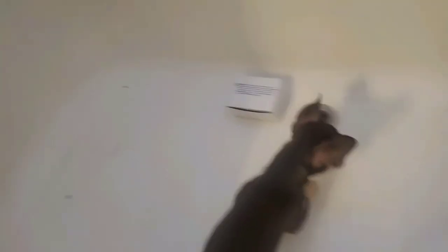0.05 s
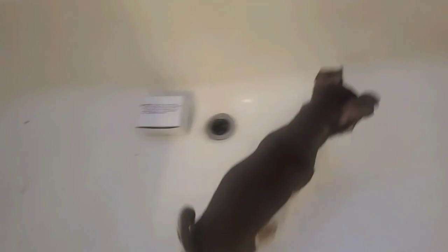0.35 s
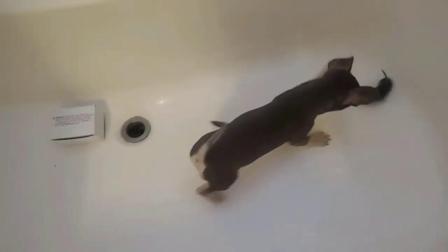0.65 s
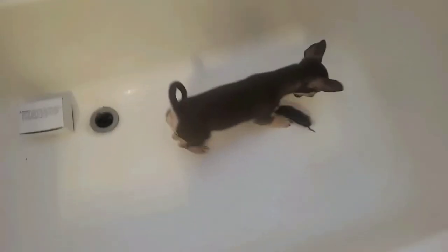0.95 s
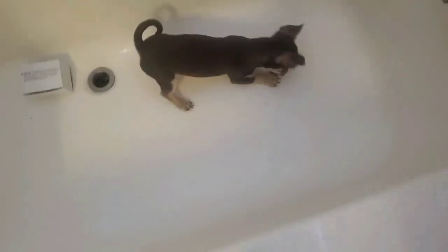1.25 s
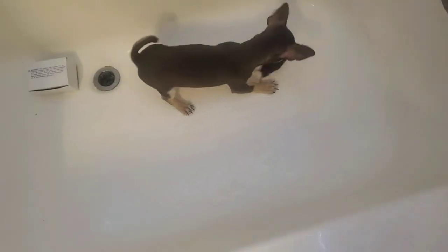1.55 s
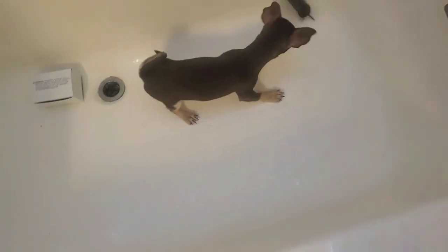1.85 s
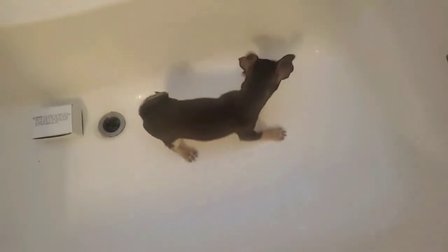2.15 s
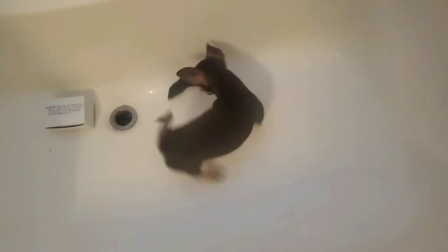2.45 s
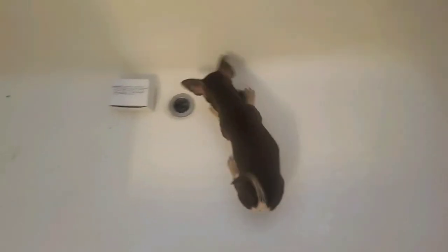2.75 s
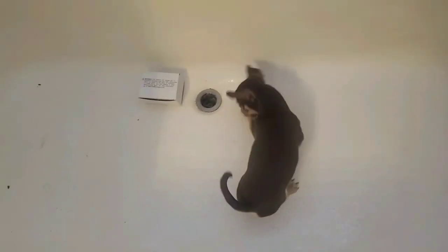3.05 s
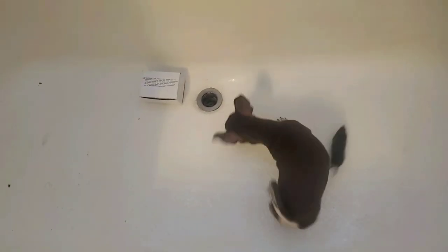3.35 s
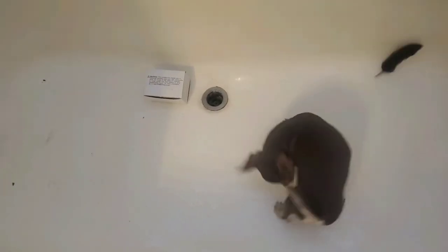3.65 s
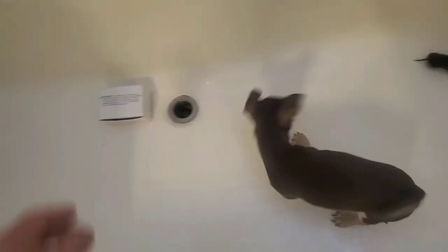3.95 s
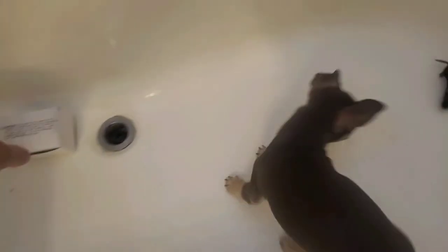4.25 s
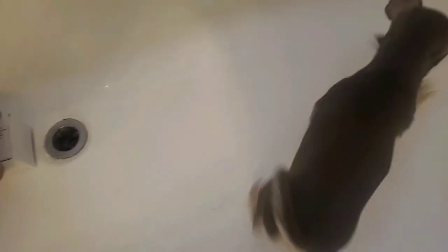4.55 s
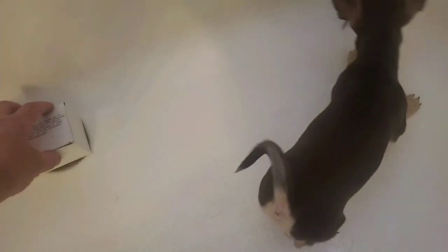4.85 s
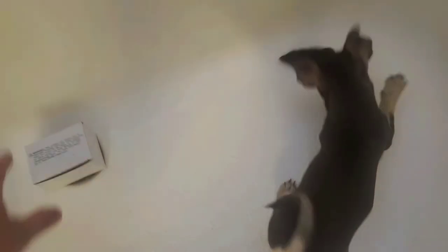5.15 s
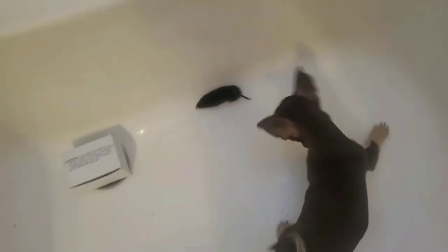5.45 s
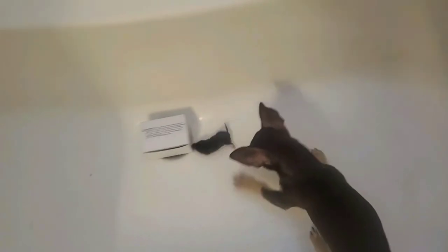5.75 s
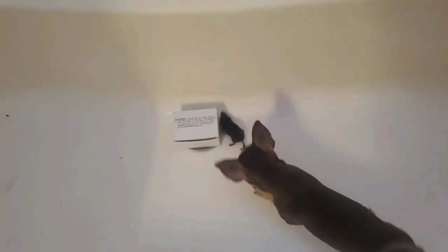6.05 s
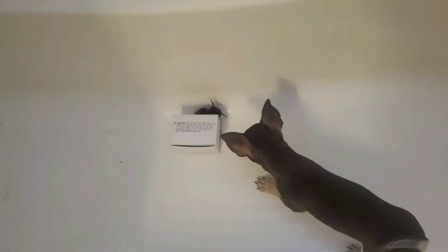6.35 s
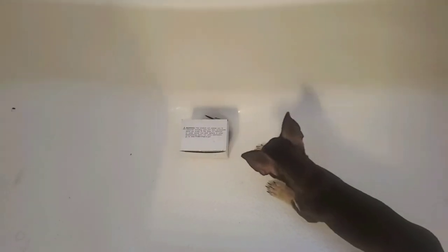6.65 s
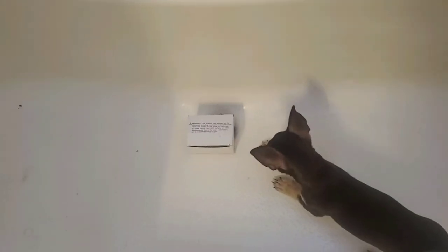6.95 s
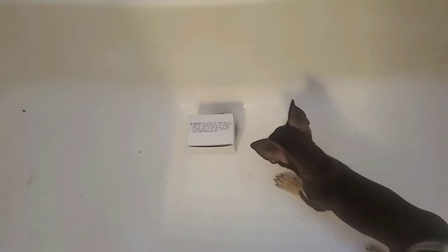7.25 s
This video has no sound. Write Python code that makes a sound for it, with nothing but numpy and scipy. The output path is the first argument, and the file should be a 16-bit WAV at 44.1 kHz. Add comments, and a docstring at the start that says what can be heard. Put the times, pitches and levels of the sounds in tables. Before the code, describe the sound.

A hand-held microphone rumbles and is bumped at the start, as a puppy's paws thud on a hollow bathtub with light claw scratching. From 0.7 seconds a shrew fires off short, very high, arched squeaks in rapid runs, the most prominent sound. Harsh hisses break in at about 0.9, 1.1 and 2.7 seconds. The squeaks pause at 3.8, resume at 4.5 with another hiss at 4.8, and stop by 5.9 seconds. Uneven paw thuds, scrabbling and a few soft slips go on underneath, strongest near 0.7, 2.7 and 6 seconds. The puppy whimpers very faintly around 2.3 to 3 seconds and briefly between 5.7 and 6.4. It then gives about four soft snorts from 6.7 to 7.2 seconds. The handling rumble swells again around 6 seconds, followed by a few light bumps. The small, hard bathroom adds a short ring.

```python
"""A shrew fires off runs of short, arched squeaks and a few harsh hisses as a puppy chases it in a bathtub.
The squeaks are high whistles; the hisses are air forced through its throat. The puppy's paws thud on
the hollow tub, scratch and slip. It whimpers faintly, and at the end snorts at the box that the shrew
hides under. The hand-held camera rumbles and is bumped now and then. A small, hard room rings."""
import sys
import numpy as np
from scipy import signal
from scipy.fft import rfft, irfft, next_fast_len
from scipy.io import wavfile
from scipy.ndimage import uniform_filter1d

SR = 44100
rng = np.random.default_rng(int(sys.argv[2]) if len(sys.argv) > 2 else 0)


def generate_wav(signal):
    """Clip the signal to [-1, 1] and save it as 16-bit WAV at the path in sys.argv[1]."""
    frames = np.transpose(np.atleast_2d(signal))
    scaled = np.clip(frames, -1, 1) * 32767
    pcm = np.round(scaled).astype(np.int16)
    wavfile.write(sys.argv[1], SR, pcm)


N = 321486
T = np.arange(N) / SR


def amp(db):
    """Turns decibels into a gain to multiply by."""
    return 10 ** (np.asarray(db) / 20)


def evened(x):
    """Scales x to an average (rms) size of 1."""
    return x / np.sqrt(np.mean(x ** 2) + 1e-20)


def peaked(x):
    """Scales x so that the mean of its channels peaks at 1."""
    return x / abs(x.mean(0)).max()


def read(points, hz):
    """Looks up hz on a curve drawn through (f/Hz, value) points."""
    f, value = np.transpose(points)
    return np.interp(np.log(hz + 1), np.log(f + 1), value)


def sides(pan_db):
    """Left and right gains whose mean is 1; a positive pan leans left."""
    gains = amp([[pan_db / 2], [-pan_db / 2]])
    return gains / gains.mean()


def add(mix, start, sound):
    """Mixes a sound in, start seconds from the beginning."""
    part = mix[:, max(round(start * SR), 0):][:, :sound.shape[1]]
    part += sound[:, :part.shape[1]]


def coloured(x, spectrum):
    """Shapes the bass and treble of x by (f/Hz, level/dB) points, at rms 1."""
    size = next_fast_len(x.shape[-1])
    gain = amp(read(spectrum, np.fft.rfftfreq(size, 1 / SR)))
    return evened(irfft(rfft(x, size) * gain, size)[..., :x.shape[-1]])


def noise(spectrum, size=N):
    """Stereo noise shaped by (f/Hz, level/dB) points."""
    return coloured(rng.standard_normal((2, size)), spectrum)


def wobble(per_s, size=N):
    """A curve that glides to a new random value per_s times a second."""
    knots = rng.standard_normal(size)
    return np.interp(np.arange(size) * per_s / SR, np.arange(size), knots)


def swell(start, attack_s, hold_s, fall_db_per_s):
    """Gain over time: rises from start, holds until start + hold_s, then dies away."""
    return np.clip((T - start) / attack_s, 0, 1) * amp(-fall_db_per_s * np.clip(T - start - hold_s, 0, 2))


def patchy(x, depth_db):
    """Makes the tone flicker, in random patches about 500 Hz wide and 20 ms long."""
    slices = signal.stft(x, SR, nperseg=512)[2]
    patches = uniform_filter1d(rng.standard_normal(slices.shape[1:]), size=6, axis=0)
    patches = uniform_filter1d(patches, size=4, axis=1)
    return signal.istft(slices * amp(depth_db * evened(patches)), SR, nperseg=512)[1][:, :N]


def room_echoes(size=16384):
    """Dense echoes off the bathroom's hard walls; the bass lasts longest."""
    # how long the room rings: f/Hz, time to fade by 60 dB/s
    ring_times = [(100, 1), (500, 0.17), (2000, 0.21), (6000, 0.3), (9000, 0.19), (15000, 0.24)]
    hz, t, slices = signal.stft(rng.standard_normal((2, size)), SR, nperseg=256)
    fade = amp(-60 * t / read(ring_times, hz)[:, None])
    echoes = signal.istft(slices * fade, SR, nperseg=256)[1]
    echoes *= np.clip(np.arange(size) / SR / 0.0029 - 1, 0, 1)  # the first echoes take a moment to arrive
    return echoes / np.linalg.norm(echoes, axis=1, keepdims=True)


def in_room(x, wet_db):
    """Direct sound plus echoes at wet_db, about as loud as before."""
    wet = signal.fftconvolve(x, room_echoes(), axes=1)[:, :N]
    return (x + amp(wet_db) * wet) / np.hypot(1, amp(wet_db))


def hand_rumble(steady_db=-47, lumps_db=2):
    """The hand on the camera makes a lumpy rumble that swells when the grip shifts."""
    # shifts of grip: t/s, hold/s, relative level/dB
    regrips = [(0, 0.56, -36), (5.8, 0.44, -35)]
    # tone of the rumble: f/Hz, level/dB
    colour = [(20, -29), (40, 1.5), (68, 13), (90, 4.5), (110, 4.5), (160, -13), (300, -17), (700, -35.5),
              (2000, -72)]
    grip = amp(steady_db)
    for start, hold, db in regrips:
        grip += amp(db) * swell(start, attack_s=0.27, hold_s=hold, fall_db_per_s=52.5)
    shared, own = noise(colour)[:1], noise(colour)  # the two microphones hear partly the same rumble
    rumble = evened((shared + 0.99 * own) * amp(lumps_db * wobble(25)))
    return amp(-3) * rumble * grip * sides(pan_db=-9.5)


def room_hush(db=-70.5):
    """The room's faint, steady background noise."""
    # tone of the hush: f/Hz, level/dB
    colour = [(30, 6.5), (150, 3.5), (400, -17), (1000, -4), (2300, -15), (5000, -10), (8000, -21),
              (15000, -19.5)]
    return amp(db) * noise(colour)


def claw_scratches(catches_per_s=240, slide=0.21):
    """Claws slide and catch on the enamel: tiny clicks of uneven size over a thin scrape."""
    # bouts of scrabbling: t/s, hold/s, relative level/dB
    bouts = [(0, 0.098, -64.5), (.3, 1.1, -60.5), (1.5, 0.058, -68.5), (2.02, 0.45, -71.5),
             (2.38, 0.54, -59), (3.111, 0.065, -58), (3.55, 0.57, -67.5), (4.55, 0.36, -59.5),
             (5.278, 0.59, -63.5), (5.651, 0.56, -63), (6.378, 1, -63)]
    # tone of claws on enamel: f/Hz, level/dB
    colour = [(200, 11), (500, 6), (900, -0.5), (1500, 5.5), (2500, -0.5), (4500, -1.5), (6000, -10),
              (8000, -18), (14000, -6.5)]
    catches = (rng.random(N) < catches_per_s / SR) * amp(2.4 * np.minimum(rng.exponential(1, N), 4))
    scrape = coloured((catches + slide) * rng.standard_normal((2, N)), colour)
    effort = sum(amp(db) * swell(start, attack_s=0.015, hold_s=hold, fall_db_per_s=110.5)
                 for start, hold, db in bouts)
    return amp(2) * in_room(patchy(scrape, depth_db=7) * effort, wet_db=1) * sides(pan_db=-1)


def camera_knocks(rub_db=-9):
    """Fingers bump the camera's case and rub on briefly, mostly at the right microphone."""
    # bumps, with relative levels: t/s, knock/dB, boom/dB, tick/dB
    bumps = [(0.091, -33.5, -36.5, -42), (0.309, -23.5, -19, -35), (.379, -28.5, -19, -53),
             (0.596, -24, -27, -27.5), (.616, -36.5, -21, -29.5), (1.647, -78, -33.5, -55),
             (1.882, -49.5, -28, -72), (2.042, -46.5, -37, -44), (3.588, -59, -23, -49),
             (5.566, -30.5, -29.5, -48), (6.271, -37.5, -30.5, -44), (6.61, -35.5, -44.5, -40.5),
             (6.705, -34.5, -29, -50), (7.125, -37.5, -34, -47)]
    knock_colour = [(60, 6.5), (200, 6), (420, -5.5), (1000, -14.5), (3000, -56.5)]
    tick_colour = [(500, 0), (1800, 1), (3000, -12), (6500, -21), (9000, -44)]
    out, t = np.zeros((2, N)), np.arange(SR // 5) / SR
    onset = 1 - np.exp(-(t / 0.0013) ** 2)  # a fingertip is soft, so the blow has no sharp edge
    touch = np.exp(-t / 0.02) + amp(rub_db) * np.exp(-t / 0.099)
    for start, knock_db, boom_db, tick_db in bumps:
        knock = peaked(noise(knock_colour, len(t))[:1] * touch * onset)
        boom = np.sin(2 * np.pi * 70 * rng.uniform(.85, 1.15) * t) * np.exp(-t / .025)
        tick = peaked(noise(tick_colour, len(t))[:1] * np.exp(-t / 0.0029) * onset)
        bump = amp(knock_db - 1) * knock + amp(boom_db - 5) * boom + amp(tick_db - 5) * tick
        add(out, start, bump * sides(pan_db=-21))
    return out


def paw_slips():
    """A paw slips on the enamel: a soft swish that swells quickly and dies away."""
    # slips: t/s, relative level/dB, length/s
    slips = [(0.461, -50.5, 0.093), (3.924, -51, 0.13), (4.064, -53.5, 0.086), (6.54, -47.5, 0.083)]
    colour = [(300, -5), (1500, -4), (4800, -3.5), (7500, -13.5), (14000, -15.5)]
    out = np.zeros((2, N))
    for start, db, length in slips:
        progress = np.linspace(0, 1, int(length * SR))
        swish = noise(colour, len(progress))
        add(out, start, amp(db) * swish * np.minimum(progress * 6, 1) * (1 - progress))
    return in_room(out, wet_db=-2) * sides(pan_db=12)


def push(t, hz):
    """A soft pressure pulse and its rebound."""
    phase = 2 * np.pi * hz * t
    return phase * (1 - phase / 2) * np.exp(-phase)


def paw_thuds(judder_s=0.035, spread_db=3):
    """A paw lands and judders, ringing the hollow tub; its claws rasp on the enamel."""
    # paws and body landing, and one further knock at 5.418 s, with relative levels: t/s, blow/dB, boom/dB, claw
    # click/dB
    footfalls = [(0.492, -34, -31, -65), (0.667, -29, -26.5, -43.5), (.832, -36.5, -60, -52),
                 (1.151, -44.5, -36.5, -48), (2.428, -36, -34, -47.5), (2.628, -36, -32.5, -38.5),
                 (2.692, -21.5, -29, -37), (3.146, -33, -29.5, -59), (3.213, -43, -32.5, -48),
                 (3.727, -47, -38, -44.5), (3.995, -48, -39, -42.5), (4.4, -43, -37, -64),
                 (4.669, -30.5, -32.5, -65), (4.772, -32, -30.5, -63.5), (5.319, -31.5, -42.5, -45.5),
                 (5.418, -38, -46.5, -61), (5.59, -34, -34, -40.5), (5.718, -35, -33.5, -42),
                 (5.894, -29, -23, -33), (6.019, -37.5, -50, -64), (6.132, -27.5, -20, -35)]
    # the notes the tub rings with: f/Hz, level/dB, time to fade by 60 dB/s
    tub_notes = [(69, -3, .45), (108, -2, .3), (160, -2, .3), (181, 0, .4), (237, -6, .32), (266, -7, .25),
                 (335, -9, .18), (420, -9, .18), (484, -11, .2), (690, -16, .12), (860, -18, .1)]
    pad_colour = [(70, -9), (170, 0), (450, -10), (900, -22), (2500, -44)]
    claw_colour = [(400, -6), (1500, 7.5), (2600, -4), (5000, -8), (8000, -14.5), (14000, -13)]
    out, t = np.zeros((2, N)), np.arange(SR // 2) / SR
    for start, blow_db, boom_db, click_db in footfalls:
        # every spot of the tub shares the blow differently among the notes
        shares_db = spread_db * rng.standard_normal(len(tub_notes))
        notes = []
        for (hz, db, fade_s), share_db in zip(tub_notes, shares_db):
            tone = np.sin(2 * np.pi * hz * rng.uniform(.96, 1.04) * t)
            notes.append(amp(db + share_db - 60 * t / fade_s) * tone)
        judder = rng.standard_normal(len(t)) * np.exp(-t / judder_s) * np.minimum(t / 0.0032, 1)
        ring = peaked(signal.fftconvolve(sum(notes[2:]), judder)[None, :len(t)])
        pad = peaked(noise(pad_colour, len(t)) * np.exp(-t / .05) * np.minimum(t / .003, 1))
        boom = peaked(signal.fftconvolve(sum(notes[:2]), push(t, hz=90))[None, :len(t)])
        claw = peaked(noise(claw_colour, len(t)) * np.exp(-t / 0.027) * amp(2 * wobble(350, len(t))))
        thud = amp(blow_db - 0.5) * (ring + .5 * pad) + amp(boom_db - 3) * boom
        add(out, start, thud * sides(pan_db=3.5) + amp(click_db - 1) * claw)
    return out


def shrew_hisses(attack_s=0.019, fall_db_per_s=295.5, deepen_db=4.5, flutter_db=1, spit_s=0.02):
    """Air forced through the shrew's throat with no clear pitch: hisses that deepen, and short spits."""
    # hisses, with relative levels: t/s, hold/s, high part/dB, low part/dB
    hisses = [(0.916, 0.083, -28.5, -37), (1.134, 0.14, -27.5, -35.5), (2.684, 0.18, -28, -35.5),
              (4.803, 0.033, -26, -37.5)]
    # tone of the high part: f/Hz, level/dB
    high_colour = [(6000, -52), (8000, -6.5), (10500, -2.5), (13500, -6.5), (15000, -5)]
    # tone of the low part, the throat's lower resonance: f/Hz, level/dB
    low_colour = [(1200, -38.5), (2500, -11), (4500, -1.5), (5800, 5.5), (7500, -11), (10000, -17)]
    # spits that open some squeaks: t/s, relative level/dB
    spits = [(.738, -21), (.795, -21), (0.855, -16.5), (1.063, -22), (1.457, -23), (2.956, -18.5),
             (3.231, -27.5), (4.454, -29), (4.486, -23), (5.744, -20), (5.818, -30.5)]
    high, low = np.zeros((2, N))
    for start, hold, high_db, low_db in hisses:
        effort = amp(-1) * swell(start, attack_s, hold, fall_db_per_s)
        throat_shut = np.clip(1 - (T - start) / hold, 0, 1)
        high += effort * amp(high_db)
        low += effort * amp(low_db - deepen_db * throat_shut)
    air = patchy(high * noise(high_colour) + low * noise(low_colour), depth_db=4)
    air *= amp(flutter_db * wobble(450))
    progress = np.linspace(0, 1, int(spit_s * SR))
    for start, db in spits:
        spit = noise([(2000, -42), (4500, -4.5), (8000, -10.5), (14000, 8.5)], len(progress))
        add(air, start, amp(db) * spit * np.minimum(progress * 10, 1) * (1 - progress))
    return in_room(air, wet_db=-6.5) * sides(pan_db=9.5)


def tub_bounces(wall_db, wet_db, count=7):
    """The direct path, a few bounces between the tub walls, then the room; new for every spot."""
    response = amp(wet_db) * room_echoes()
    delay_s = rng.uniform(.0012, 0.012, (2, count))
    bounce = amp(wall_db) * rng.choice([-1, 1], (2, count)) * np.exp(-delay_s / 0.01)
    response[[[0], [1]], (delay_s * SR).astype(int)] += bounce
    response[:, 0] += 1
    return response


def shrew_squeaks(start_ratio=.86, end_ratio=.55, crest_at=.35, jitter=.0011, overtone_db=-17):
    """A whistle jumps to its crest and plunges, turning hoarse as it falls; the throat favours 9 kHz."""
    # squeaks: t/s, length/s, crest pitch/Hz, level on the left/dB
    squeaks = [(0.743, 0.022, 9150, -21), (0.799, 0.023, 10100, -23), (0.854, .02, 10430, -25),
               (1.065, 0.033, 9400, -24), (1.328, 0.021, 10060, -22), (1.386, 0.019, 9085, -23),
               (1.459, 0.023, 8010, -25), (1.538, 0.041, 9200, -22.5), (1.621, .037, 9300, -19.5),
               (1.826, 0.043, 9000, -22.5), (1.859, 0.038, 8800, -23), (1.934, 0.041, 10170, -21),
               (2.114, .034, 9040, -19.5), (2.187, 0.028, 9970, -20), (2.257, 0.039, 9200, -24),
               (2.336, 0.027, 9420, -19), (2.414, 0.039, 8860, -18.5), (2.953, 0.038, 8590, -24.5),
               (3.021, 0.017, 9170, -21), (3.077, 0.03, 9290, -20.5), (3.143, 0.031, 9020, -21),
               (3.231, 0.034, 8770, -24), (3.323, 0.031, 8780, -24.5), (3.515, 0.035, 9180, -21.5),
               (3.602, 0.039, 10440, -24), (3.679, 0.03, 10030, -21.5), (3.76, 0.031, 10200, -24),
               (4.46, .024, 9380, -24), (4.504, .023, 9500, -17.5), (4.57, 0.027, 9900, -20.5),
               (4.628, 0.034, 9340, -19), (4.723, 0.027, 9500, -17), (4.89, 0.036, 8540, -22),
               (5.008, .04, 9350, -23), (5.099, 0.026, 9900, -20), (5.19, 0.035, 8746, -20.5),
               (5.297, 0.029, 8700, -23.5), (5.393, 0.034, 9040, -21), (5.481, 0.03, 8800, -22),
               (5.746, 0.029, 8750, -19.5), (5.826, 0.029, 8980, -18.5)]
    # squeaks lean left, the highest ones least: crest pitch/Hz, left minus right/dB
    lean = [(8800, 18), (9400, 15), (10300, 13)]
    throat = [(4500, -2), (6500, -23), (7700, -11.5), (8700, 0.5), (10000, -3), (15000, -5)]
    rasp_colour = [(1500, -35), (3500, -8), (6000, 4), (14000, -3.5)]
    out = np.zeros((2, N))
    for start, length, crest_hz, db in squeaks:
        size = int(length * SR)
        progress = np.linspace(0, 1, size)
        climb_left = np.clip(1 - progress / crest_at, 0, 1)
        fall = np.clip((progress - crest_at) / (1 - crest_at), 0, 1)
        hz = crest_hz * (1 - (1 - start_ratio) * climb_left ** 2 - (1 - end_ratio) * fall ** 3)
        phase = 2 * np.pi * np.cumsum(hz * (1 + jitter * wobble(1800, size))) / SR
        whistle = amp(read(throat, hz)) * np.sin(phase) + amp(overtone_db) * np.sin(2 * phase)
        rasp = amp(-31) * noise(rasp_colour, size)[0] * (0.11 + 2 * fall ** 2)
        shimmer_db = -2 * wobble(380, size)
        loudness = signal.windows.tukey(size, .16) * amp(shimmer_db - 0.5 * climb_left)
        voice = (whistle + rasp) * loudness
        heard = signal.fftconvolve(voice[None], tub_bounces(wall_db=-3, wet_db=4), axes=1)
        heard /= np.sqrt(np.mean(heard[:, :SR // 20] ** 2, axis=1, keepdims=True))  # first 50 ms at rms 1
        add(out, start, heard * amp([[db], [db - read(lean, crest_hz)]]))
    return out


def puppy_whimpers(overtone_db=-26, waver=0.0289):
    """Thin, unsteady whistles through the nose; each swells and fades on one glide."""
    # whimpers: t/s, length/s, starting pitch/Hz, final pitch/Hz, level/dB
    whimpers = [(2.278, .76, 1415, 1451, -53.5), (5.702, 0.039, 973, 1037, -46),
                (5.773, 0.11, 1046, 1130, -46), (6.254, 0.061, 5520, 4380, -58.5),
                (6.393, 0.045, 1167, 1217, -44)]
    out = np.zeros((2, N))
    for start, length, start_hz, end_hz, db in whimpers:
        hz = np.linspace(start_hz, end_hz, int(length * SR))
        phase = 2 * np.pi * np.cumsum(hz * (1 + waver * wobble(250, len(hz)))) / SR
        tone = evened(np.sin(phase) + amp(overtone_db) * (np.sin(2 * phase) + np.sin(3 * phase)))
        add(out, start, (tone * amp(db) * signal.windows.tukey(len(hz), .7))[None])
    return in_room(out, wet_db=8)


def puppy_snorts(flutter_db=2):
    """Air rushes out of the nose: a sharp nostril hiss mixed with a hollow puff from the muzzle."""
    # snorts: t/s, rise/s, fall/(dB per s), hiss/dB, puff/dB
    snorts = [(6.679, 0.12, 256, -70, -48.5), (6.871, 0.0056, 187, -35.5, -50),
              (6.92, 0.079, 104, -86, -41.5), (7.029, 0.06, 260, -44.5, -38)]
    # tone of the nostril hiss: f/Hz, level/dB
    hiss_colour = [(1200, -15.5), (1800, -2), (2400, -6.5), (3000, 2), (3800, 3), (4600, -7.5), (5700, -5),
                   (7500, -21), (11000, -15), (14000, -44)]
    # tone of the muzzle puff: f/Hz, level/dB
    puff_colour = [(150, -5), (350, 7.5), (1000, 6.5), (1700, 4.5), (2800, -3.5), (5000, -13.5),
                   (9000, -57)]
    hiss, puff = np.zeros((2, N))
    for start, rise, fall_db_per_s, hiss_db, puff_db in snorts:
        flow = swell(start, rise, rise, fall_db_per_s)
        hiss += amp(hiss_db) * flow
        puff += amp(puff_db) * flow
    air = hiss * noise(hiss_colour) * sides(pan_db=7) + puff * noise(puff_colour) * sides(pan_db=4)
    return in_room(air * amp(flutter_db * wobble(220)), wet_db=-6)


def scene():
    """The shrew, the puppy, the camera and the room together."""
    shrew = shrew_squeaks() + shrew_hisses()
    puppy = paw_thuds() + claw_scratches() + paw_slips() + puppy_whimpers() + puppy_snorts()
    return shrew + puppy + camera_knocks() + hand_rumble() + room_hush()


def record(dry, shadow_db=-11, cutoff_hz=14820):
    """The right microphone faces away and loses top treble; both sides are cut above cutoff_hz."""
    shade = amp(read([(10400, 0.0018), (12000, shadow_db)], np.fft.rfftfreq(N, 1 / SR)))
    heard = np.array([dry[0], irfft(rfft(dry[1]) * shade, N)])
    lowpass = signal.firwin(301, cutoff_hz, window=("kaiser", 7), fs=SR)
    return signal.oaconvolve(heard, lowpass[None], "same")


dry = scene()
out = record(dry)
generate_wav(out)
```